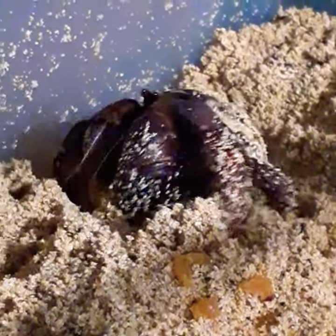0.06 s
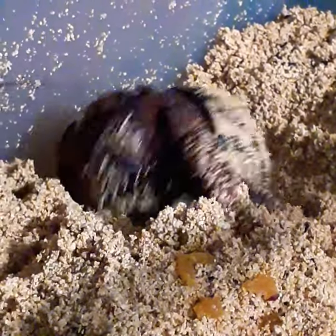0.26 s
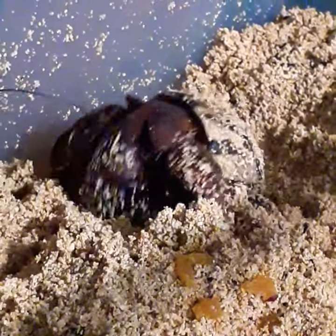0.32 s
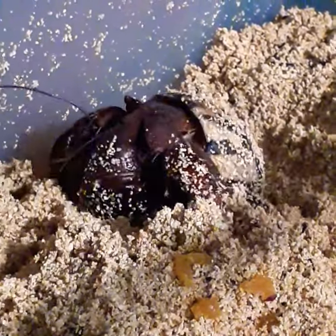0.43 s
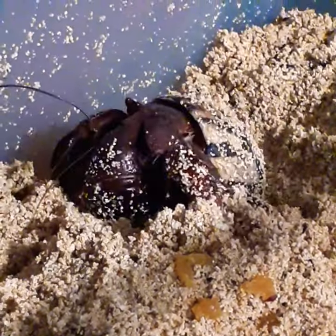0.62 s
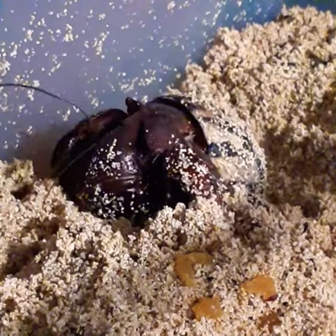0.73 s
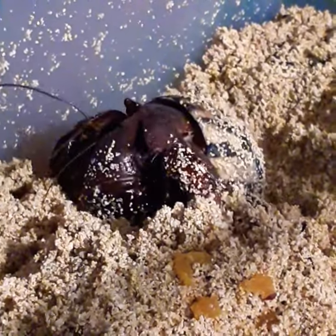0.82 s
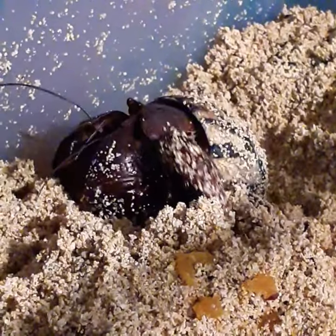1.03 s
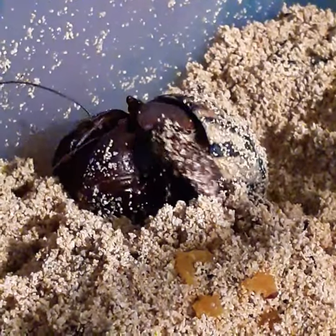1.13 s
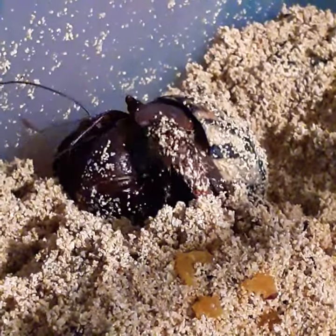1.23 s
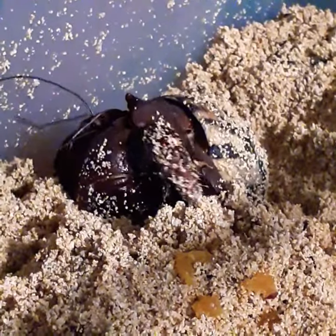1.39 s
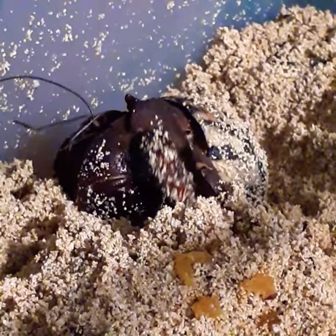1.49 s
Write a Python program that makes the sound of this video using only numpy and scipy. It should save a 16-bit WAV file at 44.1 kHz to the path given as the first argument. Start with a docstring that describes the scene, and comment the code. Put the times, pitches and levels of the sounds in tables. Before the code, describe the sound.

One sharp shell knock against a plastic tank, followed by a crab faintly rustling in sand.

```python
"""In a plastic tank in a quiet room, a hermit crab shifts in the sand and knocks its shell on the wall.
The impact excites the wall's damped modes, with a gritty crack and a diffuse tail. Friction makes
the rest of the crab's sound: the shell scuffs the wall as it settles, the body drags and the legs
scratch faintly in the sand. Behind it lie soft hiss, an electric hum and one low swell."""
import sys
import numpy as np
from scipy import signal
from scipy.fft import rfft, irfft
from scipy.io import wavfile

SR = 44100
rng = np.random.default_rng(int(sys.argv[2]) if len(sys.argv) > 2 else 0)


def generate_wav(sig):
    """Save sig (samples, or channels by samples) to the path in sys.argv[1] as 16-bit PCM at SR."""
    pcm = np.round(np.clip(np.atleast_2d(sig).T, -1, 1) * 32767).astype(np.int16)
    wavfile.write(sys.argv[1], SR, pcm)


N = 68355
TIME = np.arange(N) / SR
BIN_HZ = np.arange(N // 2 + 1) * SR / N

# the shell meets the wall and chatters once: start_s, strength_db
SHELL_CONTACTS = [(0.1556, -2), (0.1588, -10.5)]
# modes of the tank wall: pitch_hz, level_db, t60_s, left_minus_right_db, right_lag_ms
WALL_MODES = [(186.8, -32.5, 0.28, 3.5, 0.085), (317.6, -40, 0.14, 2.5, 0.084),
              (352, -38, 0.098, 6.5, 0.21), (398, -38, 0.07, 0, 0.064), (586, -21.5, 0.049, 6.5, 0.14),
              (782, -16, 0.06, 0, 0.12), (864, -20.5, 0.025, 9, 0.79), (1020, -21, 0.06, -2.4, 0.35),
              (1100, -19.5, 0.06, 7.4, -0.3), (1505, -21, 0.038, 2, 0.19), (1764, -25, 0.038, -16.5, 0.461),
              (1956, -29, 0.051, -1, 0.3), (2736, -35, 0.035, 11, 0.49), (4400, -23, 0.013, 13, 0.11),
              (6880, -9, 0.018, -1, 0.34)]
# the shell rubs the wall: start_s, length_s, level_db
SCUFF_STROKES = [(0.227, 0.01, -48), (0.2324, 0.013, -38.5), (0.2444, 0.012, -37)]
# the crab shifts its weight: start_s, length_s, level_db
BUMP_STROKES = [(0.857, 0.02, -55), (1.396, 0.059, -59)]
# legs scratch the sand: start_s, length_s, centre_hz, bandwidth_ratio, level_db
LEG_STROKES = [(0.257, 0.034, 6840, 0.18, -60.5), (0.525, 0.06, 2630, 0.36, -61),
               (0.586, 0.017, 6820, 0.12, -61), (0.59, 0.029, 4670, 0.29, -62.5),
               (0.639, 0.068, 11500, 0.26, -66.5), (0.692, 0.046, 3360, 0.25, -60.5),
               (0.83, 0.041, 8040, 0.23, -64), (0.835, 0.039, 3560, 0.3, -66.5),
               (0.871, 0.018, 3690, 0.17, -57), (0.88, 0.057, 3250, 0.18, -64),
               (1.03, 0.033, 12400, 0.3, -69), (1.147, 0.026, 6670, 0.12, -62),
               (1.201, 0.034, 6800, 0.16, -63), (1.223, 0.027, 3170, 0.05, -66.5),
               (1.256, 0.022, 6060, 0.37, -60.5), (1.284, 0.038, 9550, 0.18, -65),
               (1.328, 0.014, 7250, 0.15, -61), (1.397, 0.032, 3220, 0.08, -66),
               (1.417, 0.03, 8600, 0.28, -67), (1.432, 0.031, 3060, 0.12, -60),
               (1.505, 0.0077, 3450, 0.27, -55), (1.507, 0.024, 3350, 0.24, -62)]
# loudness contours of the body's drag and the sand's rustle: time_s, level_db
DRAG_CONTOUR = [(0, -67), (0.07, -64), (0.15, -57.5), (0.3, -62.5), (0.42, -70), (0.6, -105)]
RUSTLE_CONTOUR = [(0, -63.5), (0.14, -65.5), (0.33, -63.5), (0.45, -66), (0.61, -69), (0.66, -62.5),
                  (0.79, -69), (0.87, -63), (1.05, -67), (1.13, -69), (1.25, -69.5), (1.31, -67.5),
                  (1.39, -65), (1.55, -66)]

# spectral density of each noise: frequency_hz, relative_density_db
CRACK_SPECTRUM = [(150, -32), (700, -16), (1500, 1), (2200, -11), (3400, -8), (4500, 2.5), (5700, -10),
                  (6800, -3), (7800, -8.5), (10000, -17), (12000, -11.5), (14000, -8), (16000, -10)]
TAIL_SPECTRUM = [(60, -30), (120, 0.5), (180, -6), (260, -8), (345, 5.5), (450, -12.5), (560, 5.5),
                 (680, -7), (800, 5), (1030, 1.5), (1350, -8.5), (1560, -6), (2100, -17), (3500, -22.5),
                 (7000, -25), (10000, -33.5), (14000, -27), (16000, -48)]
SCUFF_SPECTRUM = [(50, -34), (150, -13), (350, -6.5), (440, -14.5), (555, 9), (680, -10.5), (775, 3.5),
                  (920, -14), (1200, -11), (1550, -9), (2000, -15.5), (2600, -16.5), (3500, -36),
                  (9000, -38)]
DRAG_SPECTRUM = [(60, -26), (300, -7), (580, 7), (900, -1), (1400, 2), (2100, -2.5), (2800, -8),
                 (5000, -9.5), (9000, -12), (16000, -16)]
BUMP_SPECTRUM = [(60, -23), (200, 1), (500, -30), (4000, -70)]
RUSTLE_SPECTRUM = [(1800, -31), (2450, -11), (2880, 0.5), (3110, 10), (3350, -1), (4200, 0.5), (5500, -4.5),
                   (7000, 2.5), (9000, -5.5), (11500, -3.5), (13500, -11.5), (16000, -11)]
AIR_SPECTRUM = [(25, -32), (50, -13), (80, -8.5), (115, 4), (150, -1.5), (190, -0.5), (260, -5.5),
                (340, -4.5), (430, -9), (700, -15.5), (1250, -16), (1600, -22), (1950, -33.5),
                (2450, -32.5), (3000, -27), (16000, -65)]

# the hum's two middle partials: pitch_hz, level_db
HUM_PARTIALS = [(119.2, -61), (185, -71.5)]
# its lowest and highest partials come and go: time_s, deep_level_db, high_level_db
HUM_CONTOURS = [(0, -64.5, -65), (0.2, -65, -88), (0.43, -70, -62.5), (0.55, -76, -77), (0.65, -67, -61),
                (0.76, -74, -71), (0.89, -62, -56.5), (0.99, -66, -83.5), (1.12, -66, -79),
                (1.25, -78, -63), (1.42, -90, -70.5), (1.55, -58.5, -87)]
# course of the low swell: time_s, pitch_hz, level_db
SWELL_CONTOUR = [(0.22, 99.5, -66), (0.29, 99, -57), (0.32, 100, -50.5), (0.39, 101.8, -49),
                 (0.43, 103.7, -46.5), (0.49, 108.8, -50), (0.53, 112.5, -55), (0.6, 115, -66)]
# likeness of the left and right channels: frequency_hz, coherence_ratio
STEREO_COHERENCE = [(60, 0.78), (250, 0.66), (600, 0.34), (1200, 0.049), (3000, 0.031), (12000, 0.018)]
# the side to which sand, air and hum lean: frequency_hz, left_minus_right_db
STEREO_BALANCE = [(60, -3.5), (120, 1.5), (240, -2), (480, 0.5), (950, -5), (1890, -11), (3770, 8.5),
                  (7520, -4), (15000, -1)]


def shell_knock():
    """Impact excitation: each contact rings the wall and gives a broadband crack; the tail follows."""
    grit = pan(db=7) * noise(CRACK_SPECTRUM)
    out = reverberant_tail(*SHELL_CONTACTS[0])
    for start_s, strength_db in SHELL_CONTACTS:
        crack = from_db(-34) * strike(start_s, attack_s=0.00072, t60_s=0.04)
        # a sand grain gives way just after the touch
        snap = from_db(-26.5) * strike(start_s + 0.00119, attack_s=0.00014, t60_s=0.0051)
        out += from_db(strength_db) * (wall_ring(start_s) + grit * (crack + snap))
    return out


def wall_ring(start_s, contact_hz=2190, dispersion_hz=390, dispersion_width_hz=850):
    """Modal superposition: the struck wall vibrates as a sum of exponentially damped sinusoids."""
    ring = np.zeros((2, N))
    for hz, db, t60_s, pan_db, lag_ms in WALL_MODES:
        age = np.maximum(TIME - start_s - np.array([[0], [lag_ms * 1e-3]]), 0)
        envelope = from_db(db - 60 * age / t60_s) * (age > 0)
        ring += pan(pan_db) * envelope * np.cos(2 * np.pi * hz * age)
    # bending waves disperse: an all-pass filter smears the attack
    radius = np.exp(-np.pi * dispersion_width_hz / SR)
    poles = [1, -2 * radius * np.cos(2 * np.pi * dispersion_hz / SR), radius ** 2]
    ring = signal.lfilter(poles[::-1], poles, ring + 1e-18)
    ring = filtered(ring, "high", hz=164, order=4)  # the small wall radiates little bass
    return filtered(ring, "low", contact_hz)  # the contact dulls the high modes


def reverberant_tail(start_s, strength_db, crossover_hz=2500, attack_s=0.0065):
    """Reverberation: diffuse sound in tank and room decays exponentially, here slower in the treble."""
    diffuse = noise(TAIL_SPECTRUM)
    body = filtered(diffuse, "low", crossover_hz) * strike(start_s, attack_s, t60_s=0.48)
    treble = filtered(diffuse, "high", crossover_hz) * strike(start_s, attack_s, t60_s=1)
    return from_db(strength_db - 37.5) * (body - treble)  # opposite signs avoid a crossover notch


def shell_scuffs():
    """Sliding friction: the settling shell rubs the wall in three short, dull strokes."""
    return pan(db=3) * noise(SCUFF_SPECTRUM) * stroke_train(SCUFF_STROKES)


def body_in_sand():
    """Granular friction: the turning body drags through the sand, and shifts of weight bump softly."""
    drag = noise(DRAG_SPECTRUM) * contour(DRAG_CONTOUR)
    bumps = noise(BUMP_SPECTRUM) * stroke_train(BUMP_STROKES)
    return drag + bumps


def leg_scratches():
    """Friction noise: each leg stroke in the sand is a rough burst, squeaky because its band is narrow."""
    roughness = flicker(depth_db=2.4, rate_hz=350)
    out = np.zeros((2, N))
    for start_s, length_s, centre_hz, bandwidth, db in LEG_STROKES:
        edges_hz = centre_hz * np.exp(np.array([-1, 1]) * bandwidth / 2)
        grains = filtered(roughness * rng.standard_normal((2, N)), "band", edges_hz)
        out += from_db(db) * unit_rms(grains) * stroke(start_s, length_s)
    return out


def sand_rustle():
    """Amplitude modulation: six bands of a fine rustle swell and fade independently under a fast grain."""
    spectrum = rfft(noise(RUSTLE_SPECTRUM))
    band = np.clip(np.floor(2 * np.log2((BIN_HZ + 1) / 2000)), 0, 5)  # half octaves, open at both ends
    patches = sum(irfft(spectrum * (band == k), N) * flicker(depth_db=2, rate_hz=28) for k in range(6))
    grainy = patches * flicker(depth_db=1.5, rate_hz=170)
    return unit_rms(grainy) * contour(RUSTLE_CONTOUR)


def low_swell():
    """Amplitude and frequency modulation: one low tone swells, glides up a little and fades."""
    time_s, hz, db = np.transpose(SWELL_CONTOUR)
    envelope = np.interp(TIME, time_s, from_db(db), left=0, right=0)
    return pan(db=-3.5) * envelope * tone(np.interp(TIME, time_s, hz))


def electric_hum(deep_hz=59.5, high_hz=326.3, waver_hz=1.04):
    """Superposition of partials: the middle two waver in level and pitch, the outer two come and go."""
    hum = np.zeros(N)
    for hz, db in HUM_PARTIALS:
        envelope = from_db(db) * flicker(depth_db=1.5, rate_hz=1.8)
        hum += envelope * tone(hz + waver_hz * drift(rate_hz=5.8))
    time_s, deep_db, high_db = np.transpose(HUM_CONTOURS)
    for hz, db in ((deep_hz, deep_db), (high_hz, high_db)):
        hum += from_db(np.interp(TIME, time_s, db)) * tone(np.full(N, hz))
    return hum


def room_air():
    """Stationary noise: the room's soft hiss, strongest in the bass."""
    return from_db(-58) * noise(AIR_SPECTRUM)


def noise(density):
    """Partial coherence: coloured stereo noise of unit rms, most alike in both channels in the bass."""
    mid, side = rfft(rng.standard_normal((2, N)))
    coherence = at_bins(STEREO_COHERENCE)
    stereo = np.sqrt(1 + coherence) * mid + np.sqrt(1 - coherence) * side * [[1], [-1]]
    return unit_rms(irfft(stereo * from_db(at_bins(density)), N))


def tone(hz):
    """Phase is the integral of frequency: a sine of unit rms follows a pitch curve."""
    return np.sqrt(2) * np.sin(2 * np.pi * (np.cumsum(hz) / SR + rng.random()))


def strike(start_s, attack_s, t60_s):
    """Free decay: an envelope that falls exponentially after a linear rise."""
    age = TIME - start_s
    return np.clip(age / attack_s, 0, 1) * from_db(-60 * np.maximum(age - attack_s, 0) / t60_s)


def stroke(start_s, length_s):
    """Gamma envelope: a rub swells quickly and dies away more slowly."""
    age = np.maximum(TIME - start_s, 0) / (length_s / 2)
    return age ** 2 * np.exp(2 * (1 - age))


def stroke_train(strokes):
    """Superposition of stroke envelopes, each at its own level."""
    return sum(from_db(db) * stroke(start_s, length_s) for start_s, length_s, db in strokes)


def contour(levels):
    """Gain over time, interpolated in decibels."""
    return from_db(np.interp(TIME, *np.transpose(levels)))


def drift(rate_hz):
    """Random fluctuation: low-passed noise of unit rms."""
    return unit_rms(irfft(rfft(rng.standard_normal(N)) / (1 + (BIN_HZ / rate_hz) ** 2), N))


def flicker(depth_db, rate_hz):
    """Log-normal modulation: a gain that wanders by depth_db rms."""
    return from_db(depth_db * drift(rate_hz))


def pan(db):
    """Level difference between the ears, as left and right gains."""
    return from_db(np.array([[db], [-db]]) / 2)


def placed(x):
    """Level difference by frequency: each part of the spectrum leans to its own side."""
    lean_db = at_bins(STEREO_BALANCE)
    return irfft(rfft(x) * from_db(np.array([lean_db, -lean_db]) / 2), N)


def at_bins(points):
    """Interpolation of a table on a logarithmic frequency axis."""
    hz, values = np.transpose(points)
    return np.interp(np.log(BIN_HZ + 1), np.log(hz), values)


def filtered(x, kind, hz, order=2):
    """Maximally flat low-, high- or band-pass filter."""
    return signal.sosfilt(signal.butter(order, hz, kind, fs=SR, output="sos"), x)


def from_db(db):
    """Decibels to amplitude ratio."""
    return 10 ** (np.asarray(db) / 20)


def unit_rms(x):
    """Normalisation to unit power."""
    return x / np.sqrt(np.mean(x ** 2) + 1e-20)


def scene():
    """Linear superposition: the pressures from shell, sand and room add at the microphones."""
    shell = shell_knock() + shell_scuffs()
    sand = placed(body_in_sand() + leg_scratches() + sand_rustle())
    room = low_swell() + placed(electric_hum() + room_air())
    return shell + sand + room


def record(dry, cutoff_hz=16000):
    """Band limiting: the deepest bass rolls off and the top is cut steeply."""
    dry = filtered(dry, "high", hz=35)
    return signal.sosfilt(signal.ellip(10, .1, 80, cutoff_hz, fs=SR, output="sos"), dry)


dry = scene()
out = record(dry)
generate_wav(out)
```